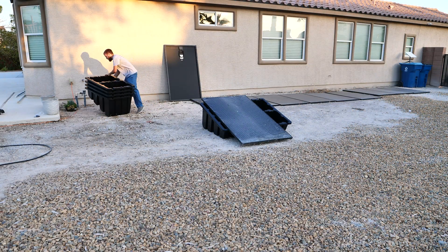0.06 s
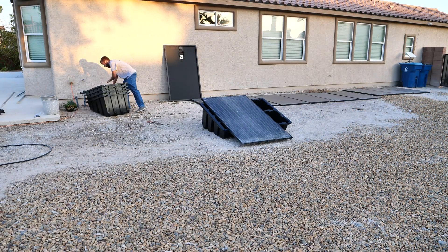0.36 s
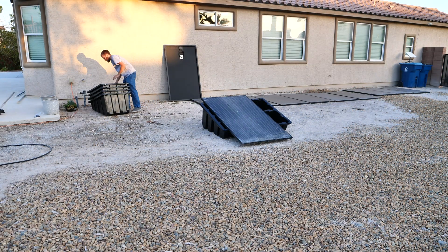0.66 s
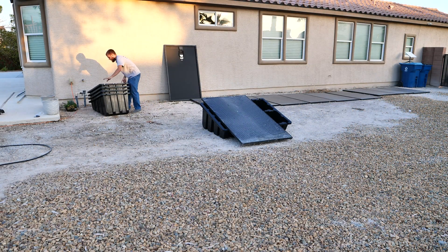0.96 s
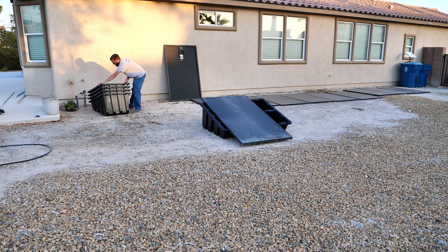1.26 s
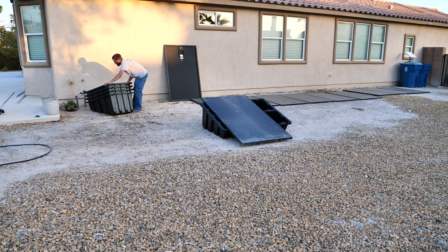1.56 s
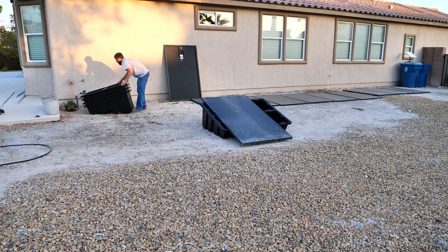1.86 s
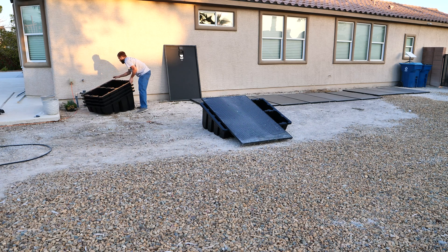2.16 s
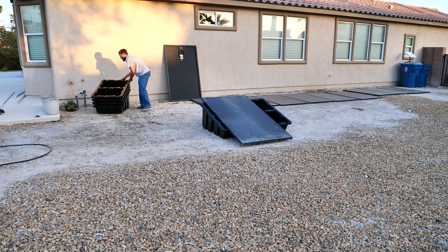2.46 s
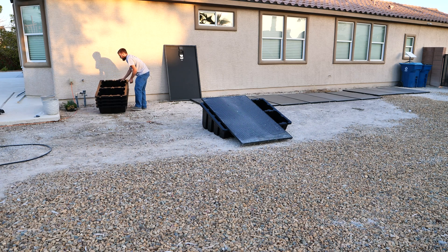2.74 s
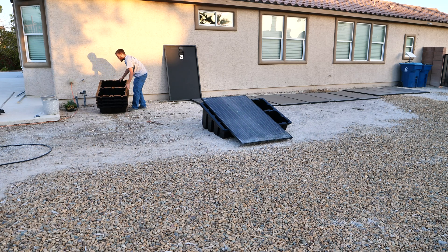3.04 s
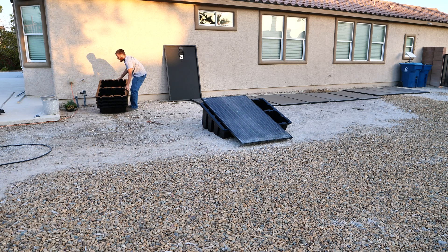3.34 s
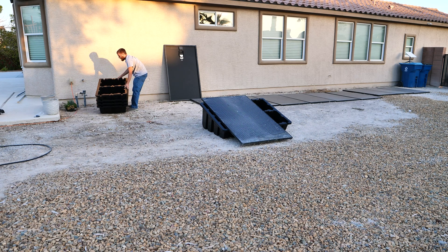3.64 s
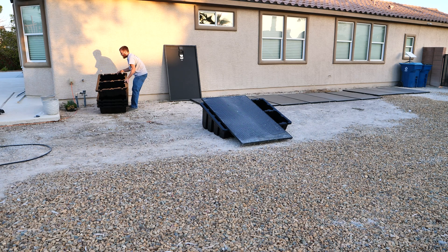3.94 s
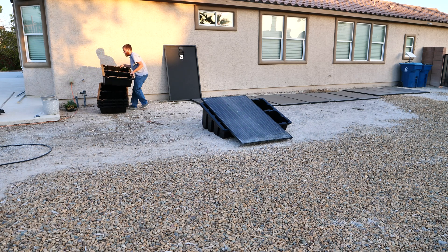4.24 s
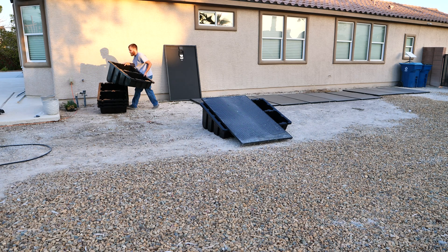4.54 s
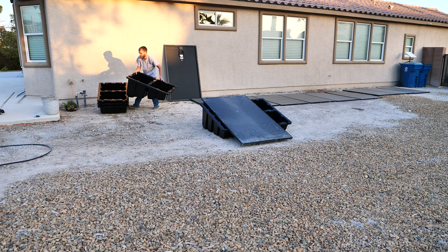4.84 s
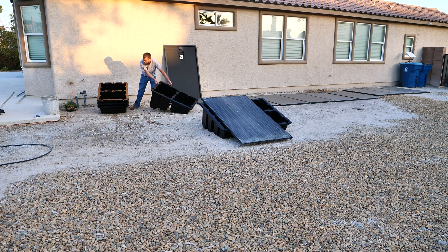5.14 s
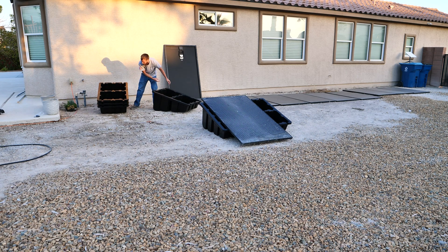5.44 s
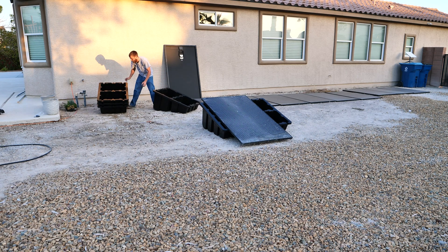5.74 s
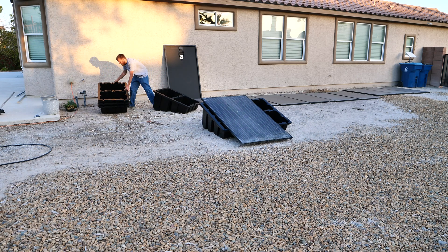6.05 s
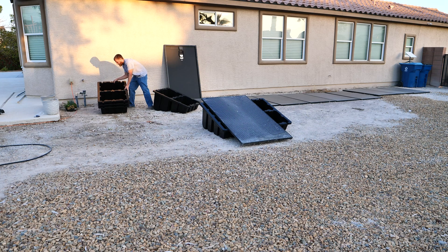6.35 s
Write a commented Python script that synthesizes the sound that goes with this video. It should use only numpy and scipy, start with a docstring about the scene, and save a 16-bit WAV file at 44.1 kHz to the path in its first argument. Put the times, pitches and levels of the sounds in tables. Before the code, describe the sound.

In a quiet yard beside a house, empty plastic trays thump and rattle, then grind hollowly across sandy ground while pebbles snap beneath them. The handling softens to a few taps, faint scuffs and a thin hiss of plastic sliding on plastic. A sharp clack and a cluster of lighter hollow knocks follow as one tray is put down, each with a short, faint echo.

```python
"""Beside a house, a stack of big empty plastic trays is tipped and shoved: each impact excites the modes
of the hollow shell, so its walls boom and its ribs clack. The stack is then dragged over dirt and stood
up; stick-slip friction drives the same modes while grit hisses under it. Last, one tray slides off with
a thin hiss and is set down with more knocks. Along the way, snapping pebbles and rebounding rims give
sharp little clicks, and the house wall reflects a short echo into the quiet yard."""
import sys
import numpy as np
from scipy import signal
from scipy.fft import rfft, irfft
from scipy.io import wavfile
from scipy.ndimage import uniform_filter1d

SR = 44100
rng = np.random.default_rng(int(sys.argv[2]) if len(sys.argv) > 2 else 0)


def transcribe(signal):
    """Save signal, clipped to [-1, 1], as a 16-bit WAV file at the path in sys.argv[1]."""
    frames = np.atleast_2d(signal).T
    limited = np.clip(frames, -1, 1)
    pcm = np.round(limited * 32767).astype(np.int16)
    wavfile.write(sys.argv[1], SR, pcm)


N = 286650
BOOM_TOP_HZ, CLACK_TOP_HZ = 300, 1500
RING_S, BLOW_S = 0.4, 0.03

# blows on the trays: time_s, rattle_ms, panel_hz, boom_db, clack_db, crack_db
BLOWS = [(0.103, 6.8, 420, -29.5, -31.5, -53.5), (0.432, 2.8, 672, -25, -24.5, -50),
         (0.457, 25, 580, -10.5, -12.5, -27), (0.486, 8.7, 271, -14.5, -22.5, -35.5),
         (0.501, 9.7, 203, -12.5, -42, -43), (0.612, 1.8, 258, -22.5, -27.5, -50.5),
         (0.672, 1.8, 715, -16, -21, -42), (0.697, 25, 154, -16, -45, -62), (0.767, 5, 730, -31, -33, -58),
         (0.845, 0.7, 385, -33.5, -34.5, -54.5), (1.248, 21, 205, -33, -44.5, -53.5),
         (1.384, 18, 815, -39.5, -37.5, -78), (1.755, 11, 850, -26, -23, -41),
         (1.857, 7.9, 570, -21, -17.5, -42), (2.002, 8.6, 157, -16.5, -24, -38),
         (2.143, 4, 425, -29, -30, -47), (2.475, 26, 518, -24.5, -20.5, -37.5),
         (2.498, 2.6, 447, -25, -18, -42), (2.568, 3.4, 248, -16, -27.5, -42),
         (3.311, 6.2, 163.4, -22, -27, -54), (3.396, 26, 198, -31, -45.5, -60),
         (3.73, 2.9, 137, -32, -51, -62.5), (4.32, 0.72, 456, -29, -33.5, -44),
         (4.9035, 0.4, 397, -20.5, -16.5, -25.5), (5.218, 7.8, 87.6, -20.5, -27.5, -34),
         (5.233, 5.5, 86, -20.5, -27, -63), (5.321, 3.1, 93, -28, -32, -50.5),
         (5.405, 17, 590, -27, -28, -37.5), (5.424, 1.5, 704, -23.5, -23, -32),
         (5.457, 9.6, 666, -25, -18.5, -32.5), (5.577, 14, 780, -36.5, -34, -50),
         (5.629, 6.8, 503, -28.5, -32, -38.5), (5.699, 13, 797, -38, -34.5, -50),
         (5.766, 15.4, 393, -36.5, -35.5, -52.5), (5.839, 8.9, 1090, -47.5, -42, -59.5),
         (6.132, 18, 518, -27.5, -28.5, -54), (6.254, 1.7, 600, -39, -42, -61.5)]

def knocks(chatter=0.32, chatter_per_s=3500, build_up=0.23, panel_cycles=19, panel_t60=0.15):
    """Impact excitation: one hard contact amid chattering rims rings the shell and the struck panel."""
    out, lead = np.zeros(N), int(BLOW_S * SR / 2)
    t, ring_t = np.arange(-lead, 3 * lead) / SR, np.arange(int(RING_S * SR)) / SR
    for (time_s, rattle_ms, panel_hz, *levels_db), shell in zip(BLOWS, tray(count=len(BLOWS))):
        force = chatter * burst(t, max(rattle_ms, 0.5) / 1000, build_up, chatter_per_s)
        force[lead] = 1
        # a blow with little crack lands on a yielding wall: the contact is longer and duller
        dullness_db = levels_db[1] - levels_db[2]
        contact_hz = np.exp(np.interp(dullness_db, [15, 27], np.log([9000, 550])))
        force = band(force, contact_hz, "low")
        # a small stiff panel barely stirs the deepest modes
        force = band(force, min(0.68 * panel_hz, 161.5), "high")
        ring = signal.fftconvolve(force, shell)
        note_t60 = min(panel_cycles / panel_hz, panel_t60)
        note = np.sin(2 * np.pi * panel_hz * ring_t) * decay(ring_t, note_t60)
        panel = unit(signal.fftconvolve(force, note))
        ring += panel * np.std(band(ring, [panel_hz / 2, panel_hz * 2], "band"))
        for part, db in zip(registers(ring), levels_db):
            onset_rms = np.std(part[lead:lead + int(BLOW_S * SR)])
            add(out, time_s - lead / SR, part * undb(db) / onset_rms)
    return out

# separate low modes of a tray: pitch_hz, relative_db, t60_s
LOW_MODES = [(78.05, 1, 1), (103.7, 4.5, 0.33), (141.1, 8, 0.34), (172.2, 5, 0.27), (199.8, 0, 0.18),
             (240.4, 0.5, 0.15), (407.4, 3.5, 0.1), (473.3, 3.5, 0.13), (593, 9.5, 0.034), (877, 2, 0.063)]
# crowded modes of its shell: frequency_hz, density_db, t60_s
DENSE_MODES = [(40, -7, 0.94), (157, -12.5, 0.083), (520, -4, 0.082), (788, -7.5, 0.057),
               (1210, -15, 0.046), (2394, -17, 0.031), (3910, -19.5, 0.026), (5460, -26, 0.014),
               (15900, -32.5, 0.026)]

def tray(count, modes_db=-17, scatter_db=2.5, flex=0.0098):
    """Modal superposition: impulse responses at count spots, each weighting the modes differently."""
    size = int(RING_S * SR)
    t = np.arange(size) / SR
    rings = np.zeros((count, size))
    for hz, db, t60 in LOW_MODES:
        strength, bend, side = rng.standard_normal((3, count, 1))
        swing = np.sign(side) * np.sin(2 * np.pi * hz * (1 + flex * bend) * t)  # load bends the pitch
        rings += undb(modes_db + db + scatter_db * strength) * swing * decay(t, t60)
    # modal overlap: each third of an octave rings as noise
    shell_hz, *columns = np.transpose(DENSE_MODES)
    for hz in 50 * 2 ** (np.arange(26) / 3):
        db, t60 = (np.interp(np.log(hz), np.log(shell_hz), column) for column in columns)
        noise = unit(band(rng.standard_normal(3 * size), hz * 2 ** (np.array([-1, 1]) / 6), "band"))
        spots = rng.integers(size // 2, 2 * size, (count, 1))
        envelope = undb(db) * np.sqrt(hz / CLACK_TOP_HZ) * decay(t, t60)
        rings += noise[spots + np.arange(size)] * envelope
    return rings

def scrape(boom_db, rasp_db, slips_per_s=170, wander_db=5, grind_db=-18):
    """Stick-slip friction: eight edges ring the tray so often that their slips merge into a grind."""
    ring = np.zeros(N)
    for shell in tray(count=8):
        slips = clicks(slips_per_s, spread_db=3)
        weight = undb(wander_db * walk(per_s=10))  # the load shifts between edges
        ring += signal.oaconvolve(slips * weight, shell)[:N]
    ring = band(ring, [190, 600], "band", order=1)  # a slip is softer than a blow, barely flexing walls
    ring += band(ring, [640, 1250], "band", order=1)  # the ribbed bottom rasps hollowly
    gains = undb(boom_db), undb(rasp_db), undb(rasp_db + grind_db)
    return sum(steady(part, span_s=0.044) * gain for part, gain in zip(registers(ring), gains))

# the stack is tipped, shoved, dragged and stood up; one curve a move: time_s, force_db, grit_db
MOVES = [
    [(0.26, -50.5, -62), (0.348, -39.5, -47.5), (0.445, -23.5, -52.5)],
    [(0.53, -29.5, -52), (0.734, -16, -45.5), (0.75, -30, -54), (1.05, -80, -84)],
    [(1.47, -36.5, -50.5), (1.528, -22.5, -44), (1.68, -21, -44), (1.715, -29, -44.5), (1.8, -19, -42),
     (1.972, -16, -41.5), (2.094, -15, -42), (2.122, -23.5, -47.5), (2.18, -15.5, -39.5),
     (2.234, -22.5, -55), (2.278, -18, -29), (2.33, -36.5, -61)],
    [(2.33, -71.5, -56), (2.358, -23.5, -34), (2.442, -24.5, -37), (2.49, -21, -43.5),
     (2.764, -30.5, -49.5), (2.854, -51, -66), (2.89, -30.5, -47), (2.97, -55, -89.5)],
]
# light rubs of a tray or a shoe: start_s, length_s, boom_db, rasp_db, grit_db
LIGHT_RUBS = [(1.16, 0.058, -55, -45, -51.5), (1.263, 0.24, -44, -50, -53), (3.244, 0.2, -54.5, -51.5, -54),
              (3.685, 0.017, -40, -46, -58), (3.804, 0.0043, -41, -44.5, -47.5),
              (4.017, 0.086, -39.5, -53.5, -59.5), (4.224, 0.18, -38.5, -46.5, -54.5),
              (4.958, 0.11, -36, -47.5, -44.5), (5.09, 0.28, -61, -61, -51),
              (5.361, 0.01, -32.5, -42, -44.5), (5.417, 0.19, -37, -36.5, -50),
              (5.96, 0.14, -38.5, -42, -46), (6.304, 0.014, -37, -51, -76), (6.405, 0.03, -62, -52, -51.5)]

def handling(rest_db=-76, drag_rasp_db=-6):
    """Masking: the strongest contact of the moment sets each level of boom, rasp and grit, in dB."""
    t = np.arange(N) / SR
    levels_db = np.full((3, N), rest_db)
    for move in MOVES:
        times_s, *curves = np.transpose(move)
        force_db, grit_db = (np.interp(t, times_s, curve) for curve in curves)
        drag_db = np.array([force_db, force_db + drag_rasp_db, grit_db])
        levels_db = np.maximum(levels_db, drag_db + touch(t, times_s[0], times_s[-1]))
    for start_s, length_s, *rub_db in LIGHT_RUBS:
        levels_db = np.maximum(levels_db, np.array(rub_db)[:, None] + touch(t, start_s, start_s + length_s))
    return levels_db

def touch(t, start_s, end_s, catch_db_per_s=266, release_db_per_s=198.5):
    """Exponential rise and decay, in dB: a sliding contact catches, holds and lets go more slowly."""
    return -catch_db_per_s * np.maximum(start_s - t, 0) - release_db_per_s * np.maximum(t - end_s, 0)

# spectrum of sand under plastic: frequency_hz, gain_db
GRIT_SPECTRUM = [(900, 4), (1600, -1.5), (4000, -7.5), (11500, -16.5), (16000, -23)]

def grit(level_db, dust_db=-9, crunch_db=5.5):
    """Shot noise: sand grains crackle in small crunches over a smoother hiss of dust."""
    sand = unit(grains(per_s=600, spread_db=4) * undb(crunch_db * np.tanh(walk(per_s=90))))
    dust = undb(dust_db) * rng.standard_normal(N)
    return unit(colour(sand + dust, GRIT_SPECTRUM)) * undb(level_db)

def grains(per_s, spread_db):
    """Resonance by size: each grain ticks in one of 14 third-octave bands, per_s a second in each."""
    edges_hz = 630 * 2 ** (np.arange(14) / 3)
    return sum(band(clicks(per_s, spread_db), [hz, 2 ** (1 / 3) * hz], "band") for hz in edges_hz)

# sharp little clicks of pebbles snapping and tray rims rebounding: time_s, relative_db
SHARP_CLICKS = [(0.675, -30), (1.679, -32.5), (1.928, -33.5), (2.259, -33), (2.353, -34.5), (2.5, -28),
                (2.649, -35), (2.9018, -44), (3.312, -44.5), (3.9086, -54.5), (4.654, -47.5), (5.375, -43),
                (5.458, -28), (5.52, -32), (5.557, -44), (6.152, -41.5)]
# spectrum of such a click: frequency_hz, gain_db
CLICK_SPECTRUM = [(500, -21), (1500, 12), (4000, 0.5), (10000, 0), (16000, -12.5)]

def sharp_clicks():
    """Broadband transients: a snapping pebble or a rebounding rim gives a brief spray of impulses."""
    out, lead = np.zeros(N), int(BLOW_S * SR)
    t = np.arange(-lead, lead) / SR
    for time_s, db in SHARP_CLICKS:
        click = burst(t, fade_s=0.0047, build_up=0.77, per_s=3000)
        add(out, time_s - BLOW_S, undb(db) * unit(click) / np.sqrt(8))
    return colour(out, CLICK_SPECTRUM)

# fine sand scuffed by a shoe or a tray: start_s, length_s, level_db
SAND_SCUFFS = [(0.27, 0.18, -56), (2.62, 0.22, -58), (4.02, 0.78, -64), (4.957, 0.16, -55),
               (5.7, 0.27, -59)]

def scuffs(band_hz=(6000, 12000)):
    """Granular friction: fine dry sand crackles crisply, swelling and fading."""
    envelope = np.zeros(N)
    for start_s, length_s, db in SAND_SCUFFS:
        add(envelope, start_s, undb(db) * np.sqrt(np.hanning(int(length_s * SR))))
    return envelope * unit(band(grains(per_s=1100, spread_db=5), band_hz, "band"))

# smooth plastic sliding: start_s, length_s, level_db
SLIDE_STROKES = [(1.247, 0.21, -53), (3.984, 0.69, -61.5), (4.893, 0.48, -53)]
# resonances of its hiss: centre_hz, gain_db
SLIDE_RESONANCES = [(4400, 11), (5550, 9.5), (8350, 5), (11900, 0.5)]

def slides(edge_ratio=1.085):
    """Friction noise through narrow resonances: smooth plastic gives a thin hiss that swells and fades."""
    out = np.zeros(N)
    for start_s, length_s, db in SLIDE_STROKES:
        noise = rng.standard_normal(N)[:int(length_s * SR)]
        hiss = sum(undb(gain_db) * band(noise, [hz / edge_ratio, hz * edge_ratio], "band")
                   for hz, gain_db in SLIDE_RESONANCES)
        swell = np.sin(np.linspace(0, np.pi, len(noise)))
        add(out, start_s, undb(db) * unit(hiss) * swell)
    return out

def house(x, echo_s=0.03, echo_db=-17, tail_db=-27, tail_t60=0.68):
    """Reflection and scattering: a dull echo from the wall, a thin tail from eaves and fences."""
    t = np.arange(int(RING_S * SR)) / SR
    tail = band(rng.standard_normal(len(t)), 2500, "low", order=1)
    tail *= decay(t, tail_t60) * np.minimum(t / echo_s, 1)
    out = x + undb(tail_db) * signal.fftconvolve(x, tail / np.linalg.norm(tail))[:N]
    add(out, echo_s, undb(echo_db) * band(x, 900, "low", order=1))
    return out

# spectrum of the outdoor air: frequency_hz, density_db
AIR_SPECTRUM = [(20, -30.5), (100, -22), (400, -31), (4000, -46), (9000, -47.5), (16000, -50.5)]

def yard(level_db=-58):
    """Ambient noise: a faint, steady rumble and hiss."""
    return unit(colour(rng.standard_normal(N), AIR_SPECTRUM)) * undb(level_db)

def burst(t, fade_s, build_up, per_s):
    """Random impulses that grow until t = 0, then fade; build_up is rise time over fade time."""
    envelope = np.exp(-np.where(t < 0, -t / build_up, t) / fade_s)
    return envelope * rng.standard_normal(len(t)) * (rng.random(len(t)) < per_s / SR)

def clicks(per_s, spread_db):
    """Poisson process: randomly timed clicks of uneven size."""
    impulses = (rng.random(N) < per_s / SR) * rng.choice([-1, 1], N)
    return impulses * undb(spread_db * np.clip(rng.standard_normal(N), -2, 2))

def walk(per_s):
    """Linear interpolation between random values."""
    steps = np.arange(N) / SR * per_s
    points = rng.standard_normal(int(steps[-1]) + 2)
    return np.interp(steps, np.arange(len(points)), points)

def registers(x):
    """Crossover into wall boom, rib clack and rim crack."""
    return (band(x, BOOM_TOP_HZ, "low", order=3), band(x, [BOOM_TOP_HZ, CLACK_TOP_HZ], "band", order=3),
            band(x, CLACK_TOP_HZ, "high", order=6))

def band(x, edges_hz, kind, order=2):
    """Causal Butterworth filter."""
    return signal.sosfilt(signal.butter(order, edges_hz, kind, fs=SR, output="sos"), x)

def colour(x, points):
    """Spectral shaping by (frequency_hz, gain_db) points."""
    hz, db = np.transpose(points)
    bins_hz = np.arange(len(x) // 2 + 1) * SR / len(x)
    return irfft(rfft(x) * undb(np.interp(np.log(bins_hz + 1), np.log(hz), db)), len(x))

def steady(x, span_s):
    """Hold the rms at 1 over span_s, keeping the faster grain."""
    size = int(span_s * SR)
    return x / np.sqrt(uniform_filter1d(uniform_filter1d(x ** 2, size), size) + 1e-9)

def decay(t, t60):
    """Exponential damping: 60 dB in t60 seconds."""
    return np.exp(-np.log(1000) * t / t60)

def undb(db):
    """Decibels to gain."""
    return 10 ** (np.asarray(db) / 20)

def unit(x):
    """Scale to rms 1."""
    return x / np.sqrt(np.mean(x ** 2) + 1e-18)

def add(out, start_s, x):
    """Mix x into out from start_s."""
    start = max(int(start_s * SR), 0)
    out[start:start + len(x)] += x[:N - start]

def scene(lurch_db=4.5, lurches_per_s=40):
    """Superposition of all sources by the house wall; scraping and grit lurch together."""
    boom_db, rasp_db, grit_db = handling() + lurch_db * np.tanh(walk(lurches_per_s))
    trays = knocks() + scrape(boom_db, rasp_db) + grit(grit_db) + sharp_clicks() + scuffs() + slides()
    trays = band(trays, 29, "high")  # open shells radiate almost nothing below their lowest mode
    return (house(trays) + yard())[None]

def record(dry, top_hz=15900):
    """Hard clipping at full scale, then a steep low-pass."""
    return signal.sosfilt(signal.ellip(10, 0.2, 80, top_hz, fs=SR, output="sos"), np.clip(dry, -1, 1))

dry = scene()
out = record(dry)
transcribe(out)
```